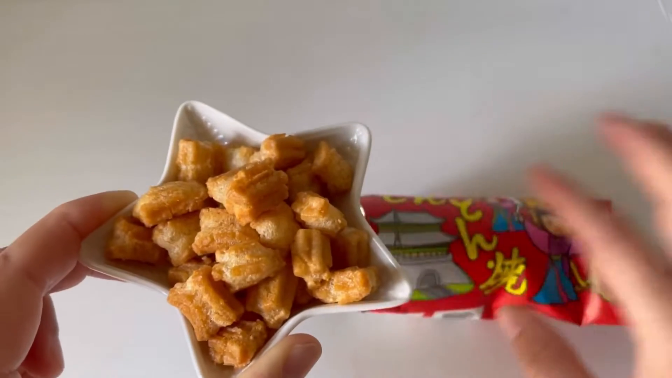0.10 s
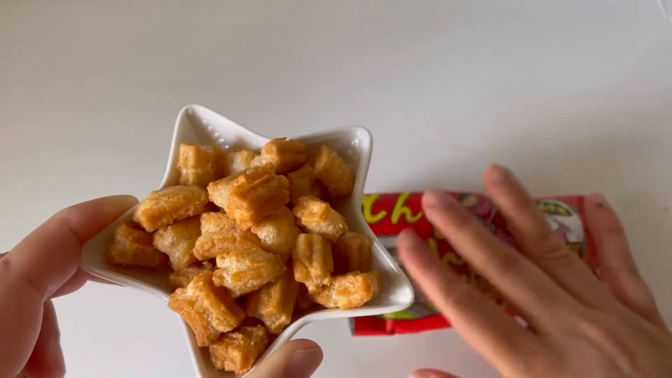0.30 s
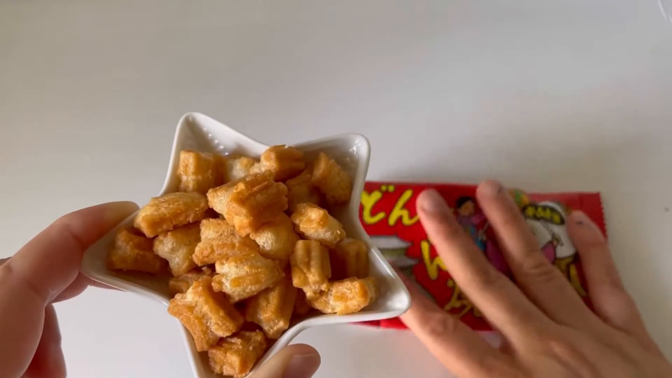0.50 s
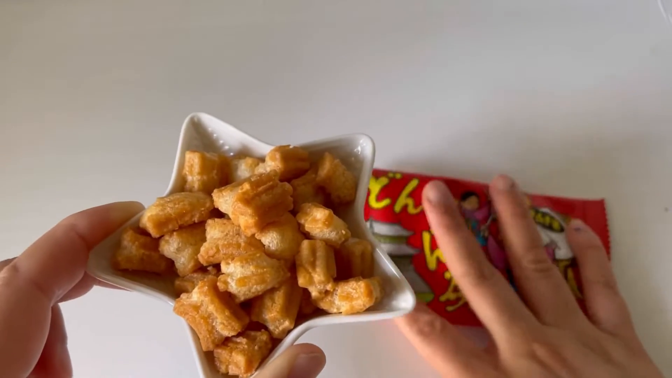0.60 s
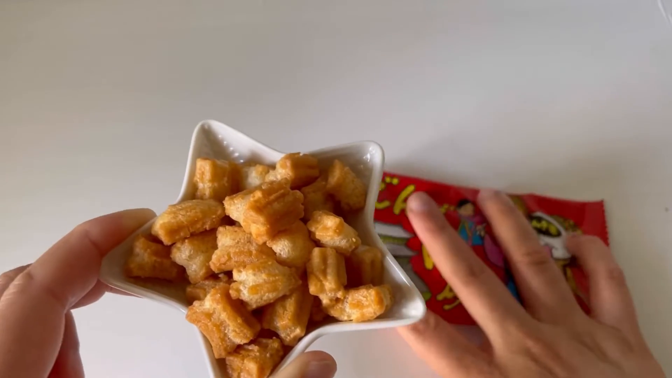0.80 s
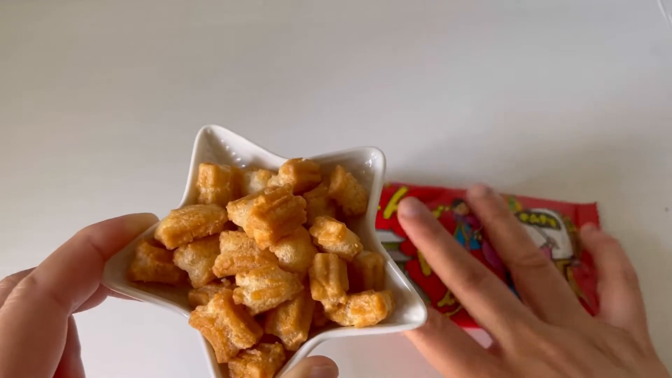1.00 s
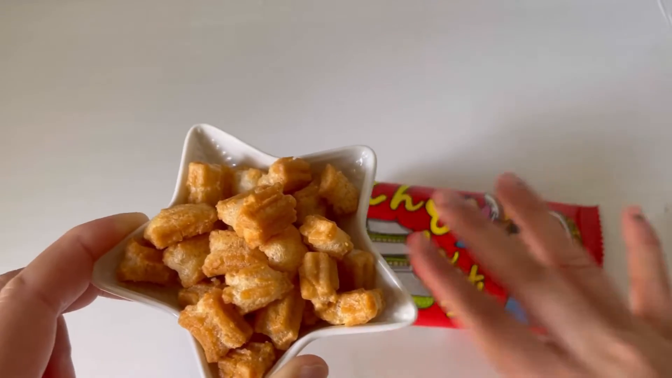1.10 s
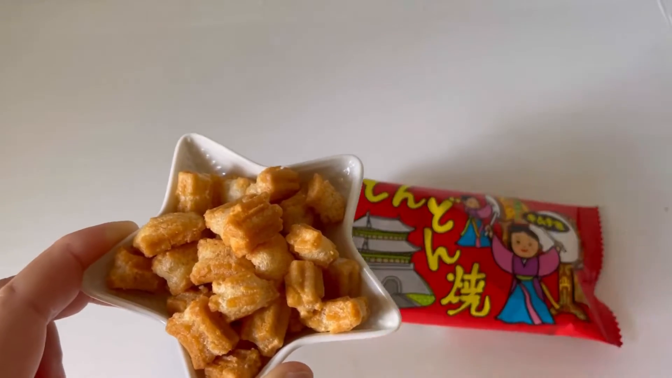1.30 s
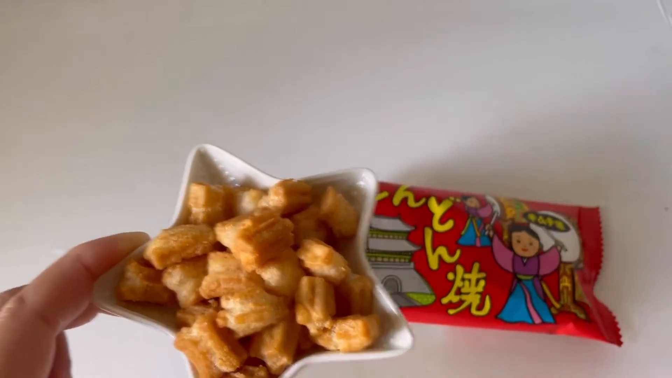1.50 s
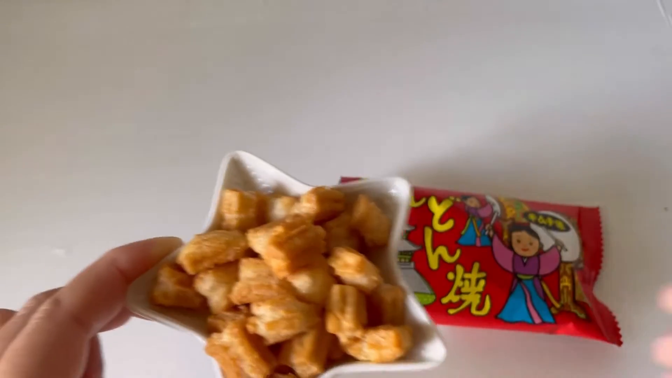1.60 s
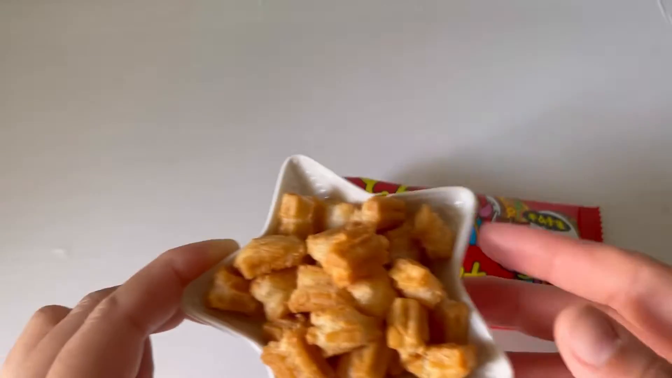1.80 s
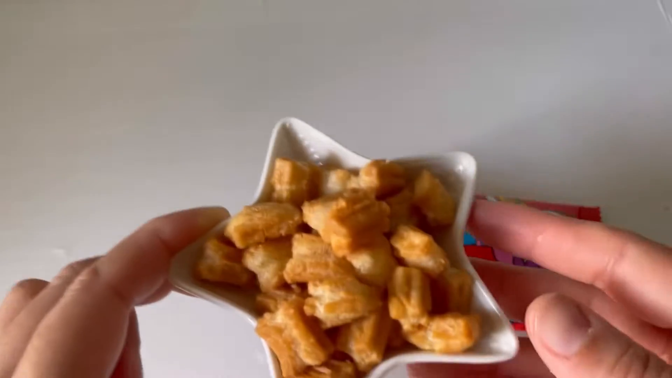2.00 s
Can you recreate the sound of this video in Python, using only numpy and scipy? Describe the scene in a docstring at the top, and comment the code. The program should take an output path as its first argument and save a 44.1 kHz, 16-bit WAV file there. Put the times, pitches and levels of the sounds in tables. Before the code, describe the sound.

Crisp crackling of a small plastic snack packet, pressed and released by a hand in a small room

```python
"""In a small room, close by, a hand settles on a plastic snack bag on a table, presses it flat and lets go.
Creases snap as short bursts of random slips in four bands, over a rustle of tiny grains of coloured noise.
A fingertip scrape is noise around a moving pitch; the last creases pop back one by one.
Soft thuds are band-passed noise, the table top thrums as one low noise resonance,
and noise echoes reflect the bag in the room, over rumble, faint hiss and a low hum."""
import sys
import numpy as np
from scipy import signal
from scipy.fft import rfft, irfft
from scipy.io import wavfile

SR = 44100
rng = np.random.default_rng(int(sys.argv[2]) if len(sys.argv) > 2 else 0)


def file_out(sig):
    """Save sig as 16-bit WAV at sys.argv[1]."""
    # one column per channel
    cols = np.atleast_2d(sig).T
    # limit, then scale
    lim = np.clip(cols, -1, 1)
    pcm = np.round(lim * 32767).astype(np.int16)
    wavfile.write(sys.argv[1], SR, pcm)


N = 88200   # two seconds

TIME = np.arange(N) / SR
BINS_HZ = np.maximum(np.arange(N + 1) * SR / (2 * N), 1)   # bins of the zero-padded spectrum
LEFT_RIGHT = np.array([[1], [-1]])   # signs that place a side signal in the two channels


def from_db(db):
    """Decibels to gain."""
    return 10 ** (np.asarray(db) / 20)


def rms_one(x):
    """Scale to rms 1, over all channels together."""
    return x / np.sqrt(np.mean(x ** 2) + 1e-20)


def in_time(rows):
    """Draw straight lines between the rows of a time table; one curve per column."""
    s, *columns = np.transpose(rows)
    return [np.interp(TIME, s, column) for column in columns]


def at_bins(points):
    """Read a frequency table at every bin, in straight lines over log frequency."""
    hz, value = np.transpose(points)
    return np.interp(np.log(BINS_HZ), np.log(hz), value)


def filtered(x, response):
    """Multiply the spectrum by a frequency response."""
    return irfft(rfft(x, 2 * N) * response)[..., :N]


def coloured(x, points):
    """Shape the spectrum of a sound by a table, then scale it to rms 1."""
    return rms_one(filtered(x, from_db(at_bins(points))))


def band(x, low_hz, high_hz):
    """Causal band-pass."""
    sos = signal.butter(2, [low_hz, high_hz], "band", fs=SR, output="sos")
    return signal.sosfilt(sos, x)


def diffuse():
    """Stereo noise, partly alike in the two channels; rms 1."""
    # Stereo width of diffuse sound: hz, side_minus_mid_db
    diffuse_width = [(60, -34.5), (180, -17), (550, -1), (1600, -11), (5000, -5.5), (12000, -29)]
    mid, side = rng.standard_normal((2, N))
    share = from_db(at_bins(diffuse_width))
    total = np.hypot(1, share)
    return rms_one(filtered(mid, 1 / total) + filtered(side, share / total) * LEFT_RIGHT)


def burst(shape, low_hz, high_hz, spike_db, side_db, size=2048):
    """A quick run of uneven slips ringing in one band; its energy equals 4 ms at rms 1."""
    attack_s, hold_s, decay_s = shape
    t = TIME[:size]
    envelope = np.minimum(t / attack_s, 1) * np.exp(-np.maximum(t - hold_s, 0) / decay_s)
    unevenness = np.minimum(rng.exponential(1, (2, size)), 5)
    slips = rng.choice([-1, 1], (2, size)) * from_db(spike_db * unevenness)
    mid, side = band(slips * envelope, low_hz, high_hz)
    stereo = rms_one(mid) + from_db(side_db) * rms_one(side) * LEFT_RIGHT
    return rms_one(stereo) * np.sqrt(0.004 * SR / size)


def snaps():
    """Each crease cracks, rings its panel of film for a few cycles and knocks on the table."""
    # Creases that snap: start_s, panel_pitch_hz, knock_db, panel_db, crack_db, sizzle_db
    creases = [(0.086, 1550, -61.5, -48, -57, -54), (0.201, 1390, -43, -25.5, -47, -43),
               (0.2305, 1550, -57, -37.5, -46, -50), (0.2681, 1607, -54.5, -34.5, -47.5, -58),
               (0.2728, 1700, -38.5, -27.5, -36.5, -46), (0.28, 1280, -42, -30, -41, -52),
               (0.2893, 1380, -27.5, -15, -25, -34), (0.3131, 1930, -50, -27.5, -33, -30),
               (0.3367, 1022, -36.5, -23, -25, -27), (0.3501, 1740, -40, -33, -35, -35),
               (0.3531, 1940, -55, -26.5, -31.5, -29.5), (0.3681, 1470, -36, -20.5, -29.5, -34.5),
               (0.3764, 1660, -48.5, -30.5, -37, -42.5), (0.3852, 1620, -34, -29.5, -30, -37),
               (0.3914, 2090, -46, -26, -30, -27), (0.4077, 1555, -56.5, -32, -41.5, -43.5),
               (0.4756, 1790, -56, -34, -54, -59.5), (0.4898, 1710, -51, -24.5, -33, -42),
               (0.5, 1640, -35.5, -23.5, -28.5, -28.5), (0.5134, 1070, -56, -34.5, -40, -47.5),
               (0.528, 1660, -52, -32, -26, -35), (0.5342, 1670, -48, -30.5, -49, -49.5),
               (0.5532, 2060, -56.5, -55, -28, -32.5), (0.5608, 1910, -69, -38, -43.5, -43),
               (0.5883, 1730, -48.5, -30, -29.5, -27), (0.5913, 1650, -50, -46, -33.5, -36.5),
               (0.6207, 1900, -56, -35.5, -50, -57.5), (0.6301, 1980, -57.5, -39.5, -36.5, -54),
               (0.6442, 1510, -60, -30, -30.5, -25.5), (0.6544, 1940, -52.5, -34, -30, -30),
               (0.661, 2010, -50, -37, -40, -39), (0.6836, 1670, -45, -33, -32.5, -51),
               (0.7289, 2060, -50, -41, -37, -35), (0.733, 2240, -49, -37.5, -49, -49),
               (0.7804, 1630, -52, -32, -37, -49.5), (0.8365, 1400, -55, -48.5, -70, -76),
               (0.8765, 1920, -64, -37, -36, -29), (0.879, 1960, -67, -39.5, -34, -34),
               (0.9139, 1950, -64, -40, -40, -39), (0.9254, 1960, -52, -60, -34, -27.5),
               (0.9337, 1910, -72, -40.5, -31.5, -45), (0.9501, 1750, -54, -29.5, -27.5, -30.5),
               (0.9588, 1800, -63, -28, -32.5, -39.5), (0.9782, 1620, -56, -34.5, -47, -64),
               (0.9936, 1590, -44, -40, -41.5, -48), (1.0089, 1560, -51.5, -27.5, -33.5, -29.5),
               (1.045, 1396, -60, -42, -61, -56), (1.0699, 1640, -42, -27, -33.5, -54),
               (1.2122, 1380, -43.5, -28.5, -30, -30.5), (1.2237, 1480, -51, -31, -41, -42),
               (1.2607, 1750, -46, -25.5, -34, -40), (1.309, 1200, -61.5, -46, -58, -56),
               (1.3728, 1247, -57.5, -25.5, -30.5, -32), (1.4579, 1393, -61.5, -29.5, -42, -58),
               (1.4646, 972, -55, -34.5, -57.5, -63)]
    # Envelopes of the parts of a snap: attack_s, hold_s, decay_s
    panel_shape = (0.00017, 0.00079, 0.0017)
    knock_shape = (0.0011, 0.0023, 0.0026)
    crack_shape = (0.00093, .0016, 0.0019)
    panel_spread = 1.357   # the band runs from the pitch divided by this to the pitch times this
    panel_grit = dict(spike_db=3.0, side_db=-20.5)   # unevenness of the slips, side minus mid
    crack_grit = dict(spike_db=0, side_db=-18.5)
    out = np.zeros((2, N))
    for start_s, hz, knock_db, panel_db, crack_db, sizzle_db in creases:
        panel = burst(panel_shape, hz / panel_spread, hz * panel_spread, **panel_grit)
        knock = burst(knock_shape, 290, 700, **panel_grit)
        crack = burst(crack_shape, 2800, 7300, **crack_grit)
        sizzle = burst(crack_shape, 8300, 12900, **crack_grit)
        snap = from_db(panel_db) * panel + from_db(knock_db) * knock
        snap = snap + from_db(crack_db) * crack + from_db(sizzle_db) * sizzle
        start = int(start_s * SR)
        out[:, start:start + snap.shape[1]] += snap
    return out


def grains(per_s, colour):
    """Tiny random slips of the film, each a short dying puff of noise; rms 1."""
    spread_db, decay_s = 3.5, 0.0013
    strength = from_db(spread_db * np.minimum(rng.exponential(1, N), 4))
    born = (rng.random(N) < per_s / SR) * strength
    # overlapping puffs add in power
    power = signal.lfilter([1], [1, -np.exp(-2 / (decay_s * SR))], born ** 2 + 1e-18)
    return coloured(np.sqrt(power) * diffuse(), colour)


def rustle():
    """Fingers rub over the film, and fine wrinkles crackle: two streams of grains."""
    # Movement of the hand: time_s, rub_db, crackle_db
    rustle_levels = [(0, -52.5, -54.5), (.06, -46, -52.5), (.11, -74, -71.5), (.185, -56.5, -67),
                     (.225, -45, -50.5), (.28, -42.5, -49.5), (.39, -40.5, -48), (.43, -55, -60),
                     (.47, -49, -53.5), (.51, -44.5, -38.5), (.60, -50.5, -57), (.67, -46.5, -40.5),
                     (.76, -57, -63), (.85, -58.5, -66), (.97, -45, -49.5), (1.08, -52.5, -59.5),
                     (1.18, -67.5, -71.5), (1.46, -56.5, -80.5), (1.54, -81, -90.5)]
    # Spectra of the two streams: hz, relative_db
    rub_colour = [(150, -10.5), (350, -7.5), (700, -5.5), (1500, -4), (2300, -6.5), (4000, -18),
                  (8000, -41.5)]
    crackle_colour = [(800, -33.5), (2000, -9), (3300, 2), (6000, 1), (9000, 0), (12500, 2), (15000, -21.5)]
    rub_db, crackle_db = in_time(rustle_levels)
    rub = from_db(rub_db) * grains(600, rub_colour)
    crackle = from_db(crackle_db) * grains(700, crackle_colour)
    return rub + crackle


def scrape():
    """Friction rings a patch of film whose pitch shifts under the fingertip."""
    # Fingertip scraping as the hand lands: time_s, pitch_hz, level_db
    scrape_path = [(0.216, 1767, -71.5), (.229, 1691, -37.5), (.255, 1298, -33.5), (0.284, 1510, -43),
                   (.30, 1600, -91)]
    width_hz = 650   # between the points where the gain is half
    pitch_hz, level_db = in_time(scrape_path)
    slips = filtered(rng.standard_normal((2, N)), 1 / (1 + (BINS_HZ * 2 / width_hz) ** 2))
    # shift the low noise up to the moving pitch
    turn = 2 * np.pi * np.cumsum(pitch_hz) / SR
    ringing = slips[0] * np.cos(turn) + slips[1] * np.sin(turn)
    sounding = (TIME > scrape_path[0][0]) * (TIME < scrape_path[-1][0])
    return from_db(level_db) * sounding * rms_one(ringing)


def bag_body(x):
    """The fixed resonances and dips of the bag lying on the table, one after another."""
    # Peaks, and dips where the level is negative: hz, level_db, width_hz
    body_modes = [(822, 6, 97), (1444, 2.5, 89), (1945, -8.5, 83), (2272, 2.5, 74), (3560, 2, 400),
                  (4790, -6, 540), (5500, 4, 240), (12530, 2, 1300)]
    for hz, level_db, width_hz in body_modes:
        b, a = signal.iirpeak(hz, hz / width_hz, fs=SR)
        x = x + (from_db(level_db) - 1) * signal.lfilter(b, a, x)
    return x


def thuds():
    """Dull, soft bumps of handling: low noise that swells fast and dies smoothly."""
    # Bumps of the hand: start_s, level_db
    bumps = [(0.0, -49), (0.357, -42.5)]
    length_s = 0.028
    envelope = 0
    for start_s, level_db in bumps:
        age = np.maximum(TIME - start_s, 0) / length_s
        envelope = envelope + from_db(level_db) * np.tanh(10 * age) * np.exp(-age ** 2)
    return envelope * rms_one(band(diffuse(), 160, 316))


def table():
    """The dragging hand excites one low resonance of the table top."""
    # Thrum under the hand: time_s, level_db
    thrum_levels = [(.25, -74), (.39, -50.5), (.48, -55.5), (.55, -41.5), (.62, -58.5), (.70, -50.5),
                    (.80, -70.5), (1.0, -56.5), (1.5, -80)]
    thrum_hz, width_hz = 139.3, 14   # width between the points where the gain is half
    level_db, = in_time(thrum_levels)
    resonance = 1 / (1 + ((BINS_HZ - thrum_hz) * 2 / width_hz) ** 2)
    ringing = signal.hilbert(filtered(rng.standard_normal(N), resonance))
    steadied = ringing.real / np.sqrt(abs(ringing))   # halves the level swings in decibels
    return from_db(level_db) * rms_one(steadied)


def room(x):
    """Quick reflections from nearby things and the tail of the room, as dying noise echoes."""
    # Spectrum of the reflected sound: hz, gain_db
    room_colour = [(120, -0.5), (400, 4.5), (1400, -6), (3000, 4), (7000, -1.5), (13000, -7),
                   (15000, -16.5)]
    gap_s = 0.0023   # silence before the first reflection
    response = 0
    for level_db, t60_s in ((-11.5, 0.026), (-12, 0.33)):   # early reflections, tail
        echoes = diffuse() * from_db(-60 * TIME / t60_s) * (TIME > gap_s)
        response = response + from_db(level_db) * rms_one(echoes) / np.sqrt(N)
    mono = x.mean(axis=0)
    return filtered(mono, rfft(response, 2 * N) * from_db(at_bins(room_colour)))


def background():
    """Low rumble and faint hiss as coloured noise, and a hum of steady sines."""
    # Spectrum of rumble and hiss: hz, relative_db
    floor_colour = [(25, -42.5), (48, -7.5), (75, -4.5), (170, -16.5), (320, -20.5), (1000, -33),
                    (2400, -34.5), (5000, -52), (16000, -65.5)]
    # Sines of the hum: hz, rms_level_db
    hum_tones = [(49, -59), (99.5, -63)]
    hum = 0
    for hz, level_db in hum_tones:
        tone = np.sqrt(2) * np.sin(2 * np.pi * (hz * TIME + rng.random()))
        hum = hum + from_db(level_db) * tone
    return hum + from_db(-55.5) * coloured(diffuse(), floor_colour)


def scene():
    """The bag and its reflections, the handling, the table and the room background."""
    bag = bag_body(snaps() + rustle() + scrape())
    return bag + room(bag) + thuds() + table() + background()


def record(dry):
    """The two microphone ports differ in phase in the treble; the top is cut."""
    # Phase between the ports: hz, left_lead_radians
    port_phase = [(1600, -0.25), (4300, 1.1), (6000, 0.79), (8000, 1.88), (9300, 2.84), (10800, 3.45),
                  (12000, 4.36), (14000, 3.8)]
    hz, radians = np.transpose(port_phase)
    lead = np.interp(BINS_HZ, np.r_[0, hz], np.r_[0, radians])
    ports = filtered(dry, np.exp(0.5j * lead * LEFT_RIGHT))
    # steep low-pass: 70 dB down from 17200 Hz upward
    sos = signal.cheby2(12, 70, 17200, fs=SR, output="sos")
    return signal.sosfilt(sos, ports)


dry = scene()
out = record(dry)
file_out(out)
```